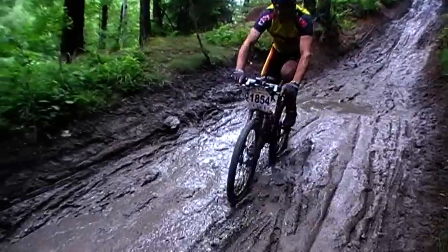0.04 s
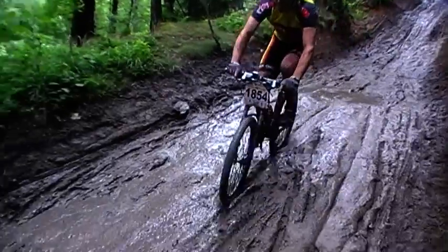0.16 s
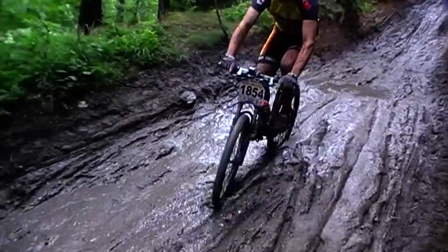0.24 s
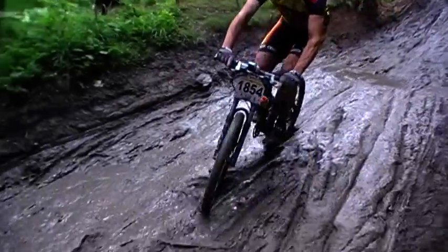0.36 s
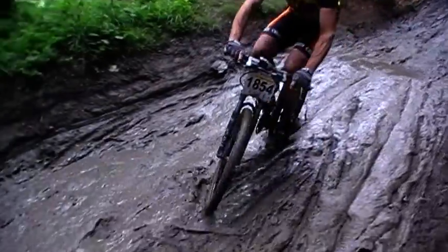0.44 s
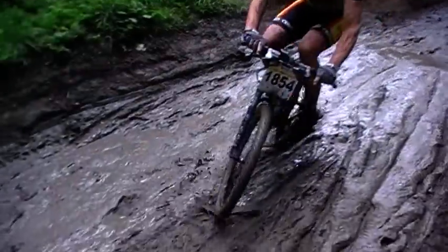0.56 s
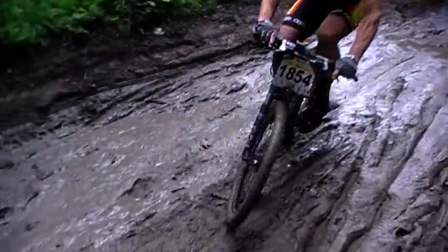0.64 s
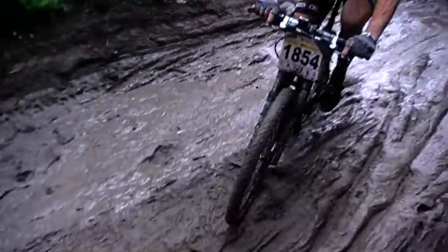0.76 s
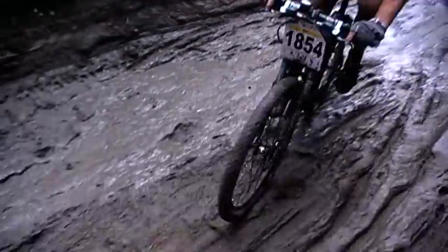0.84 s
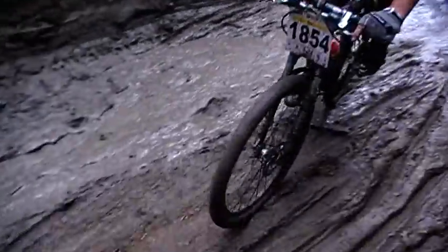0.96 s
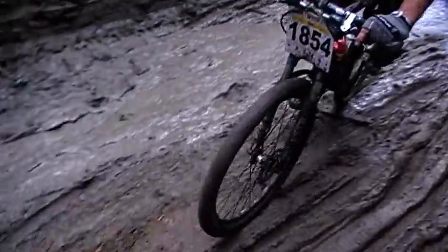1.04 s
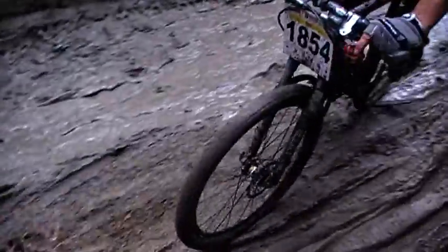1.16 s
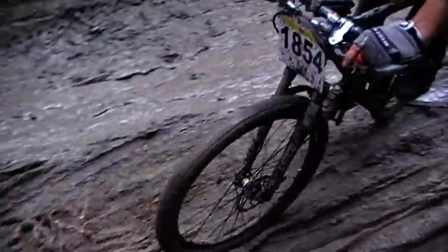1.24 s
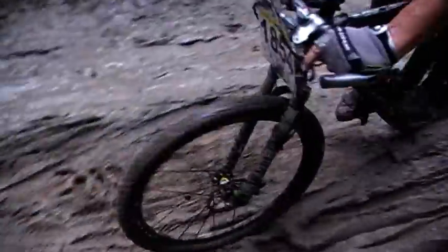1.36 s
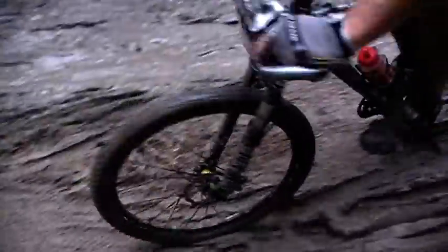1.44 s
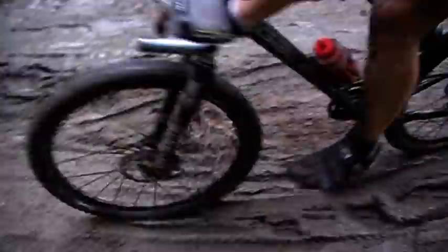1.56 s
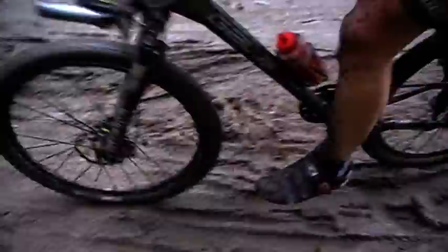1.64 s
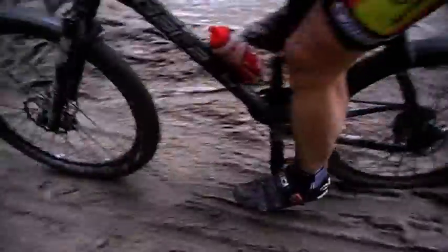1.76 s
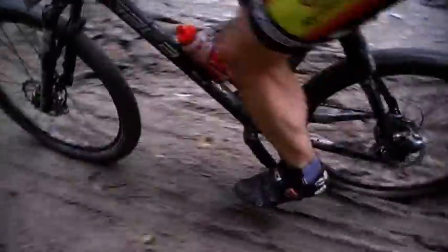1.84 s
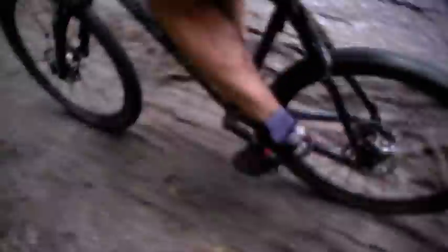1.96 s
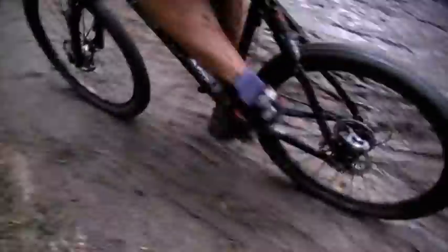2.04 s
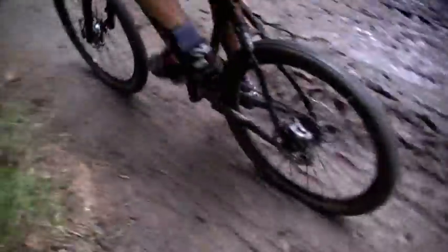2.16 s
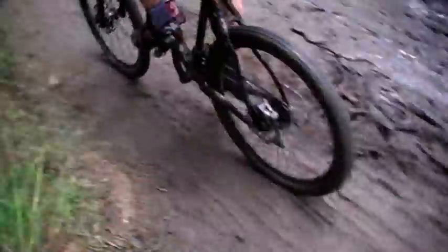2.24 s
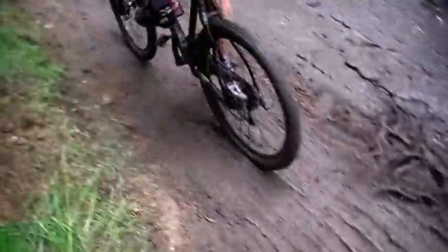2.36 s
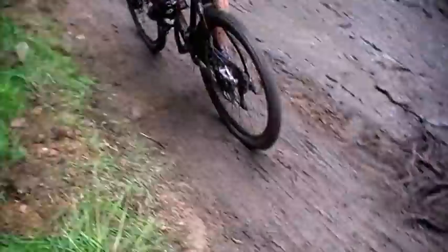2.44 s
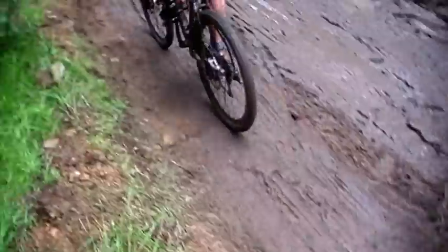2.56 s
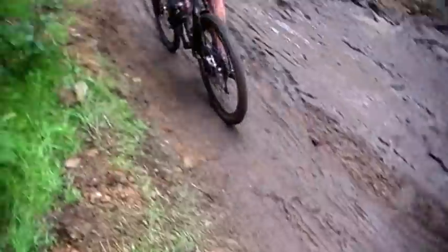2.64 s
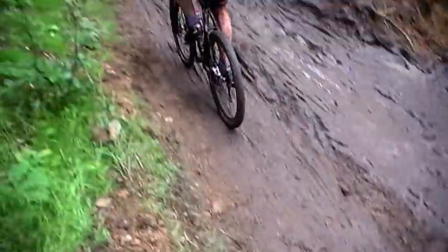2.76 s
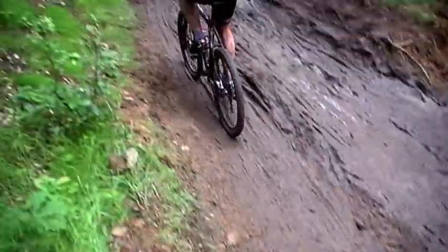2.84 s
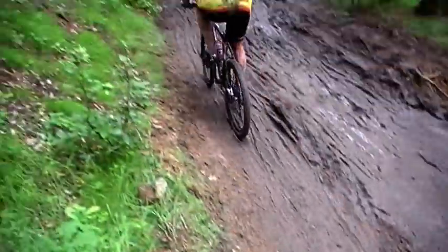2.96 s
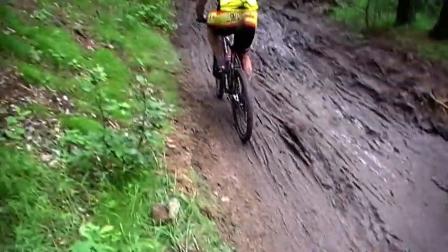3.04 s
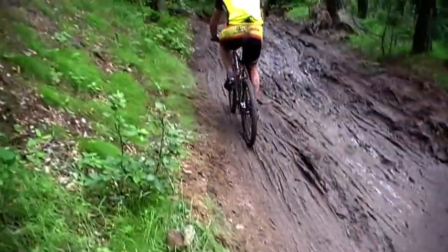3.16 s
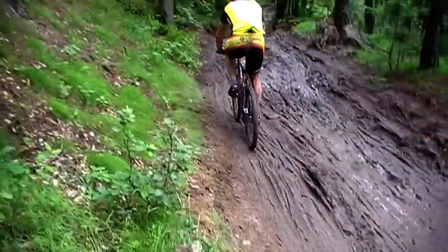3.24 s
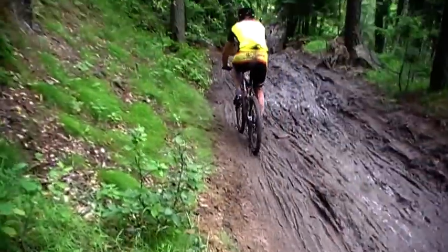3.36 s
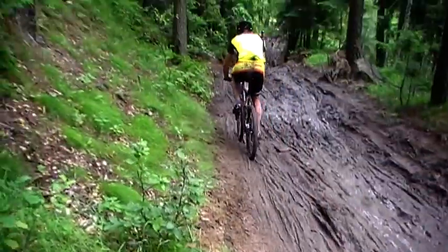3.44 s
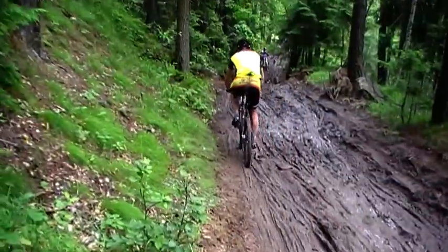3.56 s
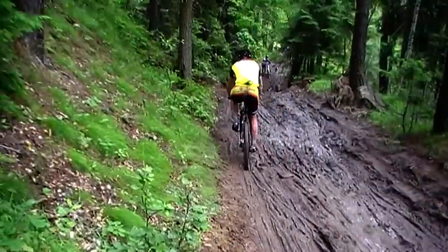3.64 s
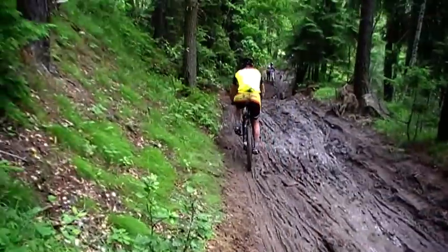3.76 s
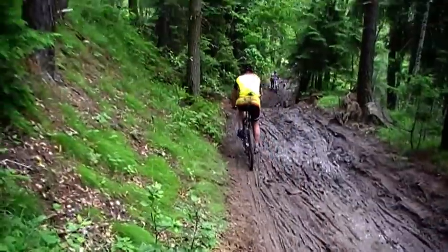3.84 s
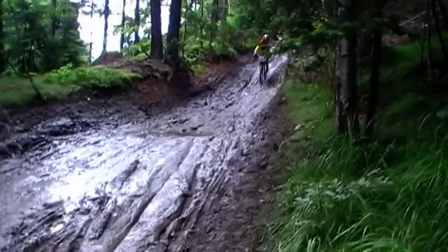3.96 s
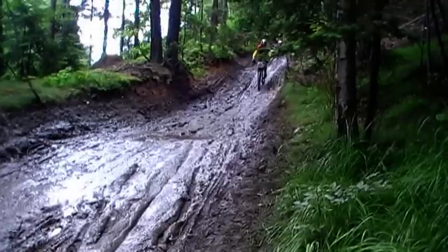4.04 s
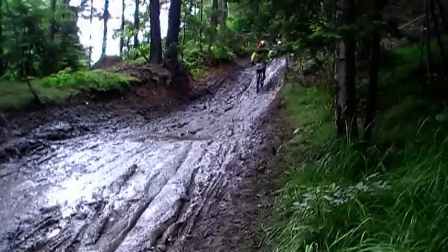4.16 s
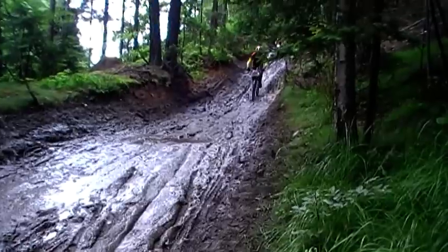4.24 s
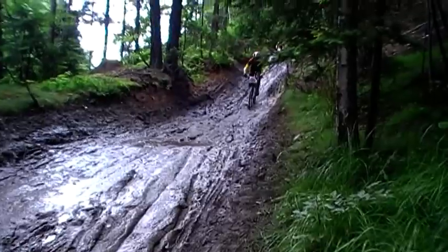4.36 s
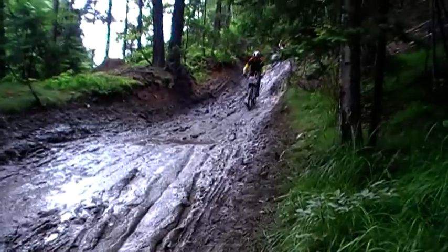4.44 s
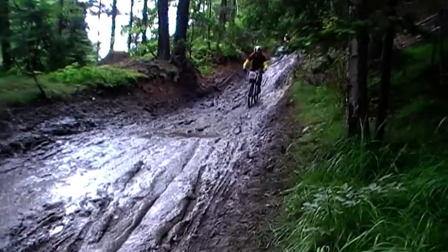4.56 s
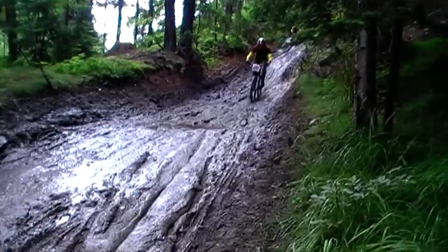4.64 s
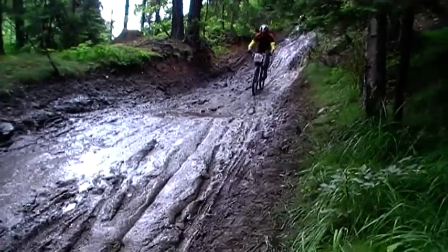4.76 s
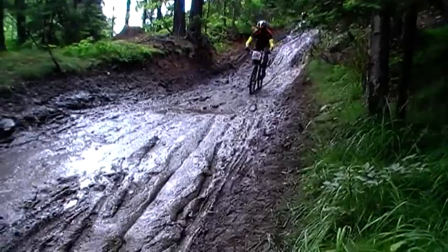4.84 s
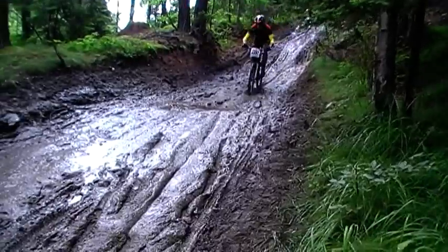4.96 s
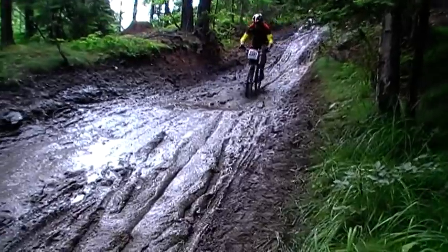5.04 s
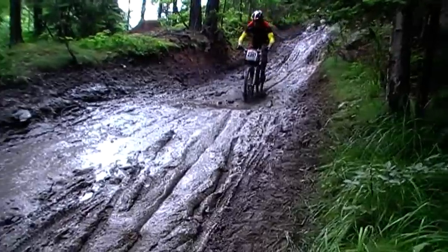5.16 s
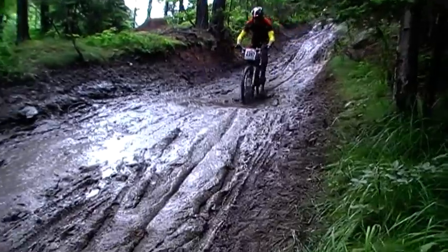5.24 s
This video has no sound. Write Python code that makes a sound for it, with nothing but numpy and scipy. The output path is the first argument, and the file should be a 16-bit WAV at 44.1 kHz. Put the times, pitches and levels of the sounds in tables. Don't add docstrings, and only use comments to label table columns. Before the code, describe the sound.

A mountain bike comes down a muddy forest trail toward a small microphone placed close to the track. From the start its tyres give a grainy wet fizz of tiny pops over squelch and a low roll, peppered with sharp grit ticks. At about 0.7 s a stickier burst brings a knock, a mud slap and snapping twigs. Hard frame clacks hit at 1.43 s, and the heaviest, dullest thud at 1.65 s. The bike passes around 1.8 s; sucking gulps and a bright hissing spray swell from 1.9 to 2.5 s, with another metallic knock at 2.15 s. It then recedes with softer crackle, rut bumps, and a small clack and slap near 3.2 s, fading to thin ticks by 4 s. After an abrupt change at about 4.07 s, a second bike starts faint, crisp and hissy, growing steadily louder and wetter until the end. Very faint, low woodland air lies beneath.

```python
import sys
import numpy as np
from scipy import signal
from scipy.fft import rfft, irfft, next_fast_len
from scipy.io import wavfile
from scipy.ndimage import uniform_filter1d

SR = 44100
rng = np.random.default_rng(int(sys.argv[2]) if len(sys.argv) > 2 else 0)


def int16_out(signal):
    q = np.round(np.clip(np.atleast_2d(signal).T, -1, 1) * 32767)
    wavfile.write(sys.argv[1], SR, q.astype(np.int16))


def decibels_to_gain(level_db):
    exponent = np.asarray(level_db, float) / 20
    return 10 ** exponent


N = 233376

SECOND_BIKE_S, NEAR_S, CROSS_S, LEAVING_S = 4.07, 5.5, 0.33, 3.06
PATCH_EDGE_S = 0.012
SUCK_HZ, SUCK_WIDTH_HZ, SUCK_DB = 1880, 300, 1
DRUM_HZ, DRUM_WIDTH_HZ, DRUM_DB = 805, 130, 0
FAR_SPRAY_HZ, FAR_SPRAY_WIDTH_HZ, FAR_SPRAY_SHARE = 5800, 2200, 0.022
FAR_SLURP_HZ, FAR_SLURP_DB = 4200, -1
AIR_DB, SNAP_DB, TICK_DB, GULP_DB, BUMP_DB, JOLT_DB = -64.5, -3.5, -1, -4.5, 5, -22.5

# start_s, load_db, water_db
RIDE = [(0.0, -38.5, -41.5), (0.65, -31, -34), (0.96, -37.5, -39.5), (1.24, -38, -38.5),
        (1.94, -31.5, -23.5), (2.06, -31.5, -21.5), (2.24, -31.5, -20.5), (2.44, -32, -24),
        (2.55, -37.5, -20), (2.65, -36, -34), (3.08, -35.5, -30), (3.31, -36.5, -37.5), (3.79, -39, -45),
        (4.08, -42, -44), (4.35, -41, -37), (4.68, -32.5, -39), (4.8, -35, -30), (5.29, -31.5, -25.5)]
# start_s, length_s, load_db, water_db
PATCHES = [(0.156, 0.11, 1, 4.5), (0.538, 0.043, 2.5, 2), (0.674, 0.067, 4.5, 0.5), (0.86, 0.046, -2, 5.5),
           (0.988, 0.085, 2.5, -1), (1.124, 0.038, -2.5, 6), (1.211, 0.094, 1.5, 6.5),
           (1.322, 0.091, -0.5, -4), (1.426, 0.075, 2, -2.5), (1.634, 0.07, -3, -2.5), (1.718, 0.17, 2, -1),
           (1.837, 0.038, -0.5, -4), (1.861, 0.13, 0, 5), (2.394, 0.11, -3.5, -4), (2.515, 0.074, 7, -2),
           (2.596, 0.12, -3.5, 3.5), (2.679, 0.035, -7, -15), (2.71, 0.083, 3, -3.5), (3, 0.086, 3, -5),
           (3.04, 0.067, -4.5, 4), (3.286, 0.029, 1, 7), (3.301, 0.19, -2, -6), (3.499, 0.02, 5.5, -2),
           (3.67, 0.037, -4.5, 2), (3.829, 0.13, 2.5, -1), (.0, 0.058, 3.5, -1), (3.708, .085, -3.5, 6),
           (3.892, 0.13, -5, -1), (1.033, 0.023, 3, 2), (3.086, 0.018, -2, 2), (0.607, 0.032, 2, 5),
           (2.582, .018, -1, -2), (1.956, 0.029, 3.5, -0.5), (2.034, 0.037, -0.5, 4), (0.434, .02, -0.5, 6),
           (1.276, .03, 0, -0.5), (3.208, .014, 0, 2),
           (4.178, 0.068, -1.5, 2.5), (4.428, 0.05, 1.5, -3.5), (4.462, 0.028, 3, 6),
                    (4.634, 0.091, -2, 6), (4.724, 0.019, -2, -4), (4.87, 0.041, 1.5, 3.5),
                    (4.934, 0.088, 1, -2.5), (5.09, 0.051, 1, 0.5), (5.125, 0.037, -1, -3),
                    (5.18, 0.035, 3.5, -1)]
MIDDLE_DB = -37, -33
# base_db, db_per_load_db, db_per_water_db
LAYERS = [
    (-47, 0.85, 0.041),
    (-40.5, 0.77, 0.094),
    (-41.5, 0.62, 0.29),
    (-32, 0.015, 0.64),
]
LAYER_EDGES_HZ = [1100, 2800, 5000]
POP_SHARE = [.08, .3, .45, .5]
BUBBLE_SHARE = [.2, .45, .35, .25]
NEEDLE_SHARE = [.01, .1, .15, .2]
GUST_DB = [0.64, 2, 2.56, 2.2]
ONCOMING_DB = [0, -2, -8.5, 0]
LEAVING_DB = [2, 2.1, 6.5, 0.5]
# start_s, end_s, pitch_share
SUCK_RISE = (1.85, 1.99, .87)
# freq_hz, density_db_per_hz
TYRE_COLOUR = [(15, -80), (25, -52), (145, -13.5), (255, -11.5), (325, -3), (515, -1), (605, -0.5),
               (731, 0), (1290, -5.5), (1880, -4), (3230, -7.5), (5540, -8), (8770, -5.5), (12800, -11),
               (15900, -24.5)]
# freq_hz, density_db_per_hz
AIR_COLOUR = [(15, -61), (25, -26), (81, -19), (162, -14), (306, -7.5), (360, -5.5), (400, -3.5),
              (520, -30), (880, -120)]
# peak_s, peak_db, centre_hz
TICKS = [(0.01, -17, 9300), (0.063, -13.5, 9270), (0.1029, -20.5, 7020), (0.1361, -13, 6480),
         (0.1435, -13.5, 8700), (0.1535, -22, 4670), (0.1867, -15, 7830), (0.2155, -15, 6050),
         (0.2464, -18.5, 7680), (0.3242, -13, 7400), (0.4202, -15, 4540), (0.4317, -16, 3610),
         (0.4571, -10, 8160), (0.4984, -12, 6110), (0.507, -10, 6200), (0.563, -10, 5050),
         (0.5744, -16.0, 5580), (0.6478, -10, 7030), (0.6965, -4, 5870), (0.6991, -10.5, 3500),
         (0.7192, -10, 5910), (0.7361, -5, 7300), (0.7793, -15.5, 7380), (0.782, -13, 8440),
         (0.8026, -21, 7680), (0.8178, -17, 8990), (0.9693, -12, 6500), (1.0257, -14, 3090),
         (1.088, -18, 4420), (1.1243, -14, 6100), (1.1583, -17, 7720), (1.2331, -11, 8100),
         (1.2484, -12, 7000), (1.29, -16, 6190), (1.3372, -16, 9660), (1.3572, -14.5, 3570),
         (1.4289, -7, 3700), (1.431, -14, 4300), (1.437, -14.5, 6360), (1.455, -14, 3900),
         (1.459, -15, 7390), (1.471, -21, 5200), (1.483, -22, 4620), (1.5289, -10, 5170),
         (1.5347, -18, 7210), (1.5463, -11, 7100), (1.587, -15, 9630), (1.6008, -11, 7370),
         (1.632, -14.0, 7810), (1.6506, -14, 3260), (1.6722, -23, 7450), (1.6938, -12, 7190),
         (1.701, -6, 7490), (1.7149, -9, 5860), (1.7346, -13, 6110),
         (1.8664, -12, 4690), (1.9887, -4, 8780), (2.074, -7, 6710), (2.156, -6, 7480),
                 (2.1743, -9.0, 6300), (2.273, -10, 7000), (2.4949, -17, 6550), (2.5507, -17, 7100),
                 (2.5753, -10.5, 6660), (2.6078, -10, 6880), (2.6627, -15, 8730), (2.6675, -9.5, 7020),
                 (2.689, -13.5, 5960), (2.6933, -22.0, 7500), (2.847, -18, 3500), (2.7698, -18.5, 4610),
                 (2.7742, -14, 8570), (2.8457, -12, 5800), (2.8726, -9.5, 8650), (2.897, -13, 7640),
                 (2.041, -13, 4900), (3.021, -16, 6840), (3.0698, -6.5, 7600), (3.1087, -11, 7020),
                 (3.1903, -8, 5800), (3.2197, -16, 6940), (3.29, -14, 8430), (3.326, -11, 7990),
                 (2.8035, -15.5, 4430), (2.127, -13, 5800), (3.377, -19, 5880), (3.4146, -18, 6020),
                 (3.4482, -24, 6250), (3.4528, -18.5, 7860), (3.4604, -20.0, 7760), (3.4678, -19, 7810),
                 (3.486, -16, 7960), (3.5439, -16, 4660), (3.5949, -14.5, 6800), (3.637, -14, 7290),
                 (3.6515, -19, 6330), (3.6575, -17, 5870), (1.896, -6, 7200), (3.74, -14.5, 4810),
                 (3.7854, -17, 6400), (3.7935, -21, 5160), (3.7996, -14, 4760), (3.8057, -19, 5330),
                 (3.8269, -21.5, 5380), (3.905, -16.5, 7330), (3.9616, -18, 6640), (3.9666, -21, 7120),
                 (4.0254, -22.0, 6370), (4.041, -14, 7190), (4.0628, -14, 7100),
         (4.0856, -30, 7620), (4.1059, -22, 4440), (4.1177, -32, 6790), (4.125, -28, 6150),
                  (4.127, -22, 8120), (4.1783, -14, 6570), (4.1815, -16, 6580), (4.1957, -15, 7850),
                  (4.2168, -21.5, 8830), (4.2332, -14, 7900), (4.2407, -15, 6440), (4.2438, -14.5, 7530),
                  (4.2566, -14, 6970), (4.2913, -19, 8050), (4.2953, -15, 6170), (4.3465, -26, 7650),
                  (4.3559, -14, 5620), (4.4156, -14, 6170), (4.4387, -21.5, 3790), (4.463, -15, 6730),
                  (4.513, -20.0, 7250), (4.5398, -9, 7390), (4.5889, -18, 6940), (4.618, -14, 6740),
                  (4.628, -14, 7000), (4.6568, -21, 7890), (4.6673, -25, 7780), (4.6703, -21, 8200),
                  (4.689, -12, 7400), (4.7964, -11, 6740), (4.8086, -14, 8310), (4.8553, -24, 6510),
                  (4.875, -18, 6760), (4.8921, -10, 6060), (4.9899, -22, 7280), (4.9956, -17, 5360),
                  (5.0223, -18, 5700), (5.0304, -15, 5660), (5.0445, -15, 5280), (5.054, -13, 6290),
                  (5.0808, -18, 8160), (5.115, -16, 5600), (5.1631, -19, 7240), (5.1678, -10, 6850),
                  (5.2407, -8, 6890)]
# start_s, peak_db, ring_hz, thud_db, clack_db
KNOCKS = [(0.036, -21, 755, -14, -1), (0.428, -23, 2280, -8, -5), (0.49, -29, 816, -22, -12),
          (0.537, -22, 2400, -18, -10), (0.6939, -6, 664, -1, -2.5), (0.7192, -11.5, 1660, -5, -2),
          (1.356, -14, 1500, -16, -1), (1.4258, -7, 1380, 1, 11), (1.4677, -6, 2160, -23, 9),
          (1.506, -20, 2010, -18, -12), (1.628, -15.5, 1380, -6, -17), (1.6478, 0.5, 605, 7, 1),
          (1.6497, -2, 616, -11, 8), (1.9005, -17, 1770, -20, -16), (1.962, -13.5, 1930, -8, -5),
          (2.109, -12, 1730, -7, -8), (2.1536, -6, 750, -26, -3), (2.452, -17.5, 1910, -8, -3),
          (2.744, -13, 770, -15, 4), (2.772, -16, 530, -6, 4), (3.128, -18, 800, -11, 1),
          (3.187, -14, 700, -5, -1), (3.487, -23, 755, -2, -9), (3.96, -26, 3200, -27, -8),
          (4.053, -26, 1200, -14, -5)]
# start_s, peak_db, ring_hz
BUMPS = [(0.208, -31, 725), (0.584, -53, 680), (0.968, -38.5, 520), (1.179, -39, 413), (1.613, -34, 475),
         (1.929, -49, 436), (2.063, -29.5, 533), (2.215, -29, 547), (2.298, -30, 450), (2.583, -33.5, 320),
         (2.695, -41, 370), (2.801, -31, 665), (2.868, -35, 474), (3.574, -38, 760), (3.635, -37, 380),
         (3.712, -32, 1150), (3.493, -35, 740)]
# start_s, peak_db, ring_hz
SLAPS = [(.6955, -16, 610), (2.1, -20, 750), (3.2, -22, 620), (3.191, -23.5, 710), (1.429, -20, 870)]
# start_s, peak_db, centre_hz, width_share
SNAPS = [(0.43, -14, 3900, 0.51), (0.4548, -13, 7500, 0.32), (0.5382, -12, 5460, 0.2),
         (0.6962, -9, 5770, 0.9), (0.7168, -8, 5050, 0.5), (0.7343, -8, 7460, 0.11),
         (0.8121, -8.5, 8000, 1), (1.3572, -10.5, 7600, 0.16), (1.4285, -6.5, 3020, 0.95),
         (1.4292, -7, 4700, 0.3), (1.4536, -11, 5360, 0.31), (1.4815, -10.5, 5090, 0.23),
         (1.5324, -11.5, 6640, 0.34), (1.6292, -9, 9300, 0.4), (1.6492, -7, 4040, 0.56),
         (1.6995, -23, 5040, 0.54), (1.8672, -8, 4700, 0.4), (2.0456, -1.5, 7900, 0.97),
         (2.106, -15, 7770, 0.37), (2.1244, -13, 5620, 0.49), (2.1536, -20, 7870, 0.36),
         (2.3474, -6.5, 6370, 1), (2.51, -7, 6000, 0.22), (2.5671, -11, 8130, 0.4),
         (2.7248, -10, 3500, 0.68), (2.8455, -13, 5500, 0.2), (3.0187, -9.5, 6900, 0.11),
         (3.053, -10, 5800, 0.23), (3.1884, -8.5, 3900, 0.7), (3.96, -16, 5850, 0.37)]
# start_s, peak_db, ring_hz
GULPS = [(0.449, -18, 2440), (0.545, -19, 2210), (0.5594, -27, 1900), (0.599, -22, 1600),
         (0.677, -17, 2660), (1.0386, -19, 2940), (1.0476, -21.5, 1300), (1.0864, -18.5, 3080),
         (1.266, -21, 2250), (1.2915, -24, 2240), (1.785, -26, 2590), (1.9187, -22, 1690),
         (1.9355, -18, 1890), (1.975, -15.5, 1820), (2.0337, -16.5, 1610), (2.0697, -19, 2890),
         (2.2847, -23, 2050), (2.3742, -22, 2620), (2.164, -20, 2280), (3.2944, -24, 2620),
         (3.5094, -37, 2870), (4.4373, -33, 1640), (4.4594, -29, 2100), (4.688, -23, 1910)]
# start_s, peak_db,
# ring_hz
AFTER_RINGS = [(.6955, -22, 730), (.704, -28, 750), (0.712, -22, 1700), (1.4235, -18, 780),
               (1.427, -25, 434), (1.436, -42, 1300), (1.471, -21, 1050), (1.646, -10.5, 1100),
               (1.651, -25, 1750), (1.656, -30, 486), (2.157, -31, 890), (2.158, -12, 2480),
               (3.959, -35, 1000), (3.96, -30, 3300), (4.037, -28, 3170), (4.053, -20.5, 3570),
               (1.863, -12, 4700), (0.431, -27, 1230), (3.055, -10, 5860)]
# start_s, peak_db, ring_hz
PINGS = [(1.4245, -21, 450), (1.429, -13.5, 2960), (2.1542, -15, 1180), (3.1862, -31.5, 397),
         (3.1884, -16, 3630), (3.9603, -29.5, 980), (3.9612, -25, 2140), (4.0378, -25.5, 3150)]
# start_s, peak_db
JOLTS = [
    (1.4262, -4),
    (1.6478, -3),
    (2.1533, -13),
]
# freq_hz, side_minus_mid_db
WIDTH = [(60, -9), (110, -8), (200, -9.5), (380, -15), (700, -15), (1290, -29), (2380, -12), (4400, -18.5),
         (8120, -11), (15000, -10.5)]
# freq_hz, left_minus_right_db
LEAN = [(60, 1), (110, 1), (200, 2.5), (380, 1), (700, 1), (1290, 1.5), (2380, 0), (4400, -2), (8120, -0.5),
        (15000, 0.5)]


def amp_of(points, hz):
    f, db = np.transpose(points)
    return decibels_to_gain(np.interp(np.log(hz + 1), np.log(f + 1), db))


def evened(x):
    return x / np.sqrt(np.mean(x ** 2) + 1e-20)


def shaped(x, gain):
    size = next_fast_len(N)
    return irfft(rfft(x, size) * gain(np.fft.rfftfreq(size, 1 / SR)), size)[..., :N]


def low_pass(hz, power):
    return lambda f: 1 / (1 + (f / hz) ** power)


def high_pass(hz, power):
    return lambda f: 1 / (1 + (hz / (f + 1)) ** power)


def wander(size):
    return evened(uniform_filter1d(uniform_filter1d(rng.standard_normal(N), size), size))


def ring(x, hz, width_hz):
    r = np.exp(-np.pi * width_hz / SR)
    return signal.lfilter([1, 0, -1], [1, -2 * r * np.cos(2 * np.pi * min(hz, 16000) / SR), r * r], x)


def ring_twice(x, hz, width_hz):
    return ring(ring(x, hz, width_hz), hz, width_hz)


def hits(rows, voice):
    size = 2048
    out = np.zeros(N + size)
    noise = rng.standard_normal((len(rows), size))
    for (start_s, peak_db, *rest), puff in zip(rows, noise):
        sound = voice(puff, np.arange(size) / SR, *rest)
        at = round((start_s + .001) * SR)
        out[at:at + size] += decibels_to_gain(peak_db) * sound / abs(sound).max()
    return out[:N]


def layer_levels(t):
    s, *ride_db = np.transpose(RIDE)
    load_db, water_db = (np.interp(t, s, db) - mid_db for db, mid_db in zip(ride_db, MIDDLE_DB))
    for start_s, length_s, more_load_db, more_water_db in PATCHES:
        to_edge_s = np.minimum(t - start_s, start_s + length_s - t)
        inside = np.clip(to_edge_s / PATCH_EDGE_S + .5, 0, 1)
        load_db = load_db + more_load_db * inside
        water_db = water_db + more_water_db * inside
    far = np.clip((t - SECOND_BIKE_S) / CROSS_S + .5, 0, 1)
    far = far * np.clip((NEAR_S - t) / (NEAR_S - SECOND_BIKE_S), 0, 1)
    gone = (t < SECOND_BIKE_S) * np.clip((t - LEAVING_S) / (SECOND_BIKE_S - LEAVING_S), 0, 1)
    return [base_db + a * load_db + b * water_db + far * far_db + gone * gone_db
            for (base_db, a, b), far_db, gone_db in zip(LAYERS, ONCOMING_DB, LEAVING_DB)]


def hiss(patchy_db):
    frames = N // 64 + 5
    a, b, c, d, patches = rng.standard_normal((frames, 129, 5)).T
    patches = evened(uniform_filter1d(uniform_filter1d(patches, 9, 0), 12, 1))
    z = np.array([a + 1j * b, c + 1j * d]) * decibels_to_gain(patchy_db * patches)
    return evened(signal.istft(z, nperseg=256, noverlap=192)[1][:, :N])


def pops(per_s, spread_db, cycles, clump_db):
    chance = per_s / SR * decibels_to_gain(clump_db * wander(size=200))
    size = decibels_to_gain(spread_db * np.minimum(rng.exponential(1, N), 2.8)) * (rng.random(N) < chance)
    pitches_hz = np.geomspace(200, 15000, 30)
    odds = pitches_hz ** .6
    kind = np.searchsorted(np.cumsum(odds) / np.sum(odds), rng.random(N))
    train = size * np.array([rng.choice([-1., 1.], N), rng.standard_normal(N)])
    out = np.zeros((2, N))
    for k, hz in enumerate(pitches_hz):
        u = np.arange(int(8 * cycles * SR / hz)) * hz / SR
        rising = u * (1 + 0.0393 * u / cycles)
        grain = u * np.exp(-u / cycles) * np.sin(2 * np.pi * rising)
        grain *= hz ** 0.23 / np.linalg.norm(grain)
        out += signal.oaconvolve(train * (kind == k), grain[None], axes=1)[:, :N]
    return out


def mud_layers(levels_db):
    smooth = hiss(patchy_db=2.0)
    grains = pops(per_s=2500, spread_db=3.0, cycles=0.45, clump_db=2.0)
    bubbles = pops(per_s=900, spread_db=0.0, cycles=3.59, clump_db=3.5)
    needles = pops(per_s=270, spread_db=3.0, cycles=0.37, clump_db=1.0)
    gust = 0.1 * wander(size=120) + 0.5 * wander(size=400)
    edges_hz, layers = [1e-3, *LAYER_EDGES_HZ, 1e6], []
    for k, level_db in enumerate(levels_db):
        lo, hi = edges_hz[k:k + 2]

        def band(f):
            power = 1 / (1 + (f / hi) ** 14) - 1 / (1 + (f / lo) ** 14)
            return amp_of(TYRE_COLOUR, f) * np.sqrt(power + 1e-12)

        share = POP_SHARE[k]
        layer = np.sqrt(1 - share) * evened(shaped(smooth, band))
        layer += np.sqrt(share) * evened(shaped(grains, band))
        layer += BUBBLE_SHARE[k] * evened(shaped(bubbles, band))
        layer += NEEDLE_SHARE[k] * evened(shaped(needles, band))
        swell = decibels_to_gain(GUST_DB[k] * (gust + 0.5 * wander(size=1400)))
        layers.append(decibels_to_gain(level_db) * evened(layer * swell))
    return layers


def mud_hollow(squelch, t):
    start_s, end_s, pitch_share = SUCK_RISE
    low = (t > start_s) * np.clip((end_s - t) / (end_s - start_s), 0, 1)
    open_ring = ring(squelch, SUCK_HZ, SUCK_WIDTH_HZ)
    closing_ring = ring(squelch, pitch_share * SUCK_HZ, SUCK_WIDTH_HZ)
    return 0.026 * ((1 - low) * open_ring + 2.7 * low * closing_ring)


def tyres():
    t = np.arange(N) / SR
    second = t > SECOND_BIKE_S
    coming = second * np.clip(NEAR_S - t, 0, 1)
    levels_db = layer_levels(t)
    roll, squelch, slurp, spray = mud_layers(levels_db)

    suck = np.clip((levels_db[1] + 45) / 18, 0, .9) * np.where(t < SECOND_BIKE_S, 1, .3)
    hollow = mud_hollow(squelch, t)
    drum = decibels_to_gain(DRUM_DB) * ring(roll, DRUM_HZ, DRUM_WIDTH_HZ)
    roll = .85 * roll + .009 * drum * np.clip(1.2 - t / 4.5, 0, 1)
    roll -= 0.82 * second * shaped(roll, low_pass(400, 6))

    spray = spray + FAR_SPRAY_SHARE * coming * ring(spray, FAR_SPRAY_HZ, FAR_SPRAY_WIDTH_HZ)
    slurp = slurp + decibels_to_gain(FAR_SLURP_DB) * coming * shaped(slurp, high_pass(FAR_SLURP_HZ, 12))
    far = np.clip((-0.5 - levels_db[3]) / 30, 0, .75)
    far += second * np.clip(0.43 * (4.9 - t), 0, .25)
    top = shaped(spray, high_pass(11500, 6))
    return roll + (1 - 0.17 * suck) * squelch + decibels_to_gain(SUCK_DB) * suck * hollow + slurp + spray - far * top


def air():
    noise = rng.standard_normal((2, N))
    return decibels_to_gain(AIR_DB) * evened(shaped(noise, lambda f: amp_of(AIR_COLOUR, f)))


def tick(puff, t, hz):
    cycles, tail_db, tail_t60_s = 1.35, -6, 0.0084
    u = np.maximum((t - .001) * hz + .5, 0)
    clean = u * np.exp(-u / (.5 * cycles)) * np.sin(2 * np.pi * u) * np.sign(puff[0])
    spit = ring(puff * (u > 0) * decibels_to_gain(-60 * t / tail_t60_s), hz, 0.52 * hz)
    return clean / abs(clean).max() + decibels_to_gain(tail_db) * spit / abs(spit).max()


def knock(puff, t, hz, thud_db, clack_db):
    rattle_t60_s = 0.034
    blow = np.exp(-((t - .0012) / .0001) ** 2) + .15 * np.exp(-((t - .0031) / .0001) ** 2)
    rattle = puff * decibels_to_gain(-60 * t / rattle_t60_s) * np.minimum(t / 0.0014, 1) ** 2
    drive = 0.61 * evened(blow) + 0.64 * evened(rattle)
    tube = evened(ring_twice(drive, hz, 560))
    thud = decibels_to_gain(thud_db) * evened(ring(drive, 390, 220))
    clack = decibels_to_gain(clack_db) * evened(ring_twice(drive, 800, 2850))
    return -(tube + thud + clack)


def bump(puff, t, hz):
    drive = puff * decibels_to_gain(-60 * t / 0.025) * np.minimum(t / 0.0005, 1)
    return ring_twice(drive, hz, 0.82 * hz)


def snap(puff, t, hz, width_share):
    t60_s = 0.01 + 0.025 * width_share
    crack = np.exp(-((t - .0005) * hz / .09) ** 2) * 1.3
    spit = puff * decibels_to_gain(-60 * t / t60_s) * np.minimum(t / 0.00037, 1) ** 2
    return ring_twice(crack + .7 * spit, hz, 3.1 * width_share * hz)


def gulp(puff, t, hz):
    t60_s, width_share = 0.037, 0.26
    drive = puff * decibels_to_gain(-60 * t / t60_s) * np.minimum(t / 0.00073, 1)
    return ring_twice(drive, hz, width_share * hz)


def ping(puff, t, hz):
    cycles = 1.93
    u = t * hz
    return u * np.exp(-u / (.5 * cycles) / (1 + hz / 2500)) * np.sin(2 * np.pi * u)


def jolt(puff, t):
    return np.exp(-((t - .002) / 0.00022) ** 2)


def capsule(f):
    return 1 / np.sqrt((1 + (330 / (f + 1)) ** 7) * (1 + (f / 12500) ** 7))


def scene():
    ticks = [(s - .002, db, hz) for s, db, hz in TICKS]
    struck = decibels_to_gain(TICK_DB) * hits(ticks, tick)
    struck += hits(KNOCKS, knock)
    struck += decibels_to_gain(BUMP_DB) * hits(BUMPS, bump)
    struck += decibels_to_gain(SNAP_DB) * hits(SNAPS, snap)
    struck += decibels_to_gain(GULP_DB) * hits(GULPS + AFTER_RINGS, gulp)
    struck = shaped(struck, capsule)
    mid, side = tyres() + air()
    side = 1.12 * side + signal.hilbert(struck).imag
    side = shaped(side, lambda f: amp_of(WIDTH, f) * high_pass(70, 2)(f))
    mid = mid + struck + shaped(hits(SLAPS, bump) + hits(PINGS, ping), capsule)
    mid = mid + decibels_to_gain(JOLT_DB) * shaped(hits(JOLTS, jolt), low_pass(300, 4))
    return np.array([mid + side, mid - side])


def band_limit(x):
    return signal.sosfilt(signal.butter(12, 16030, fs=SR, output="sos"), x)


def record(dry):
    lean = lambda f: np.sqrt(amp_of(LEAN, f)) ** np.array([[1], [-1]])
    clipped = np.clip(shaped(dry, lean), -1, 1)
    limited = shaped(clipped, lambda f: np.clip((16050 - f) / 120, 0, 1))
    return band_limit(limited)


dry = scene()
out = record(dry)
int16_out(out)
```